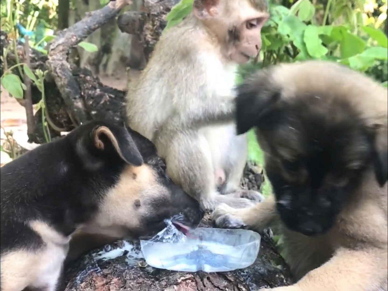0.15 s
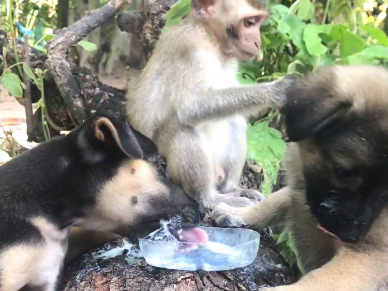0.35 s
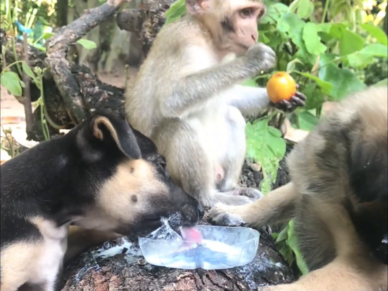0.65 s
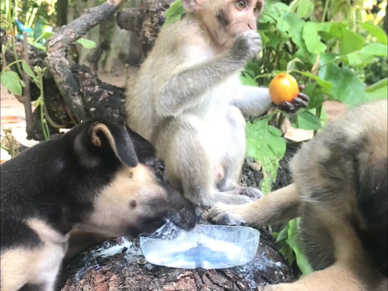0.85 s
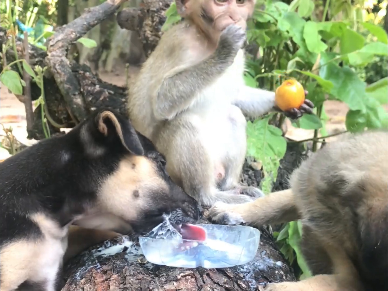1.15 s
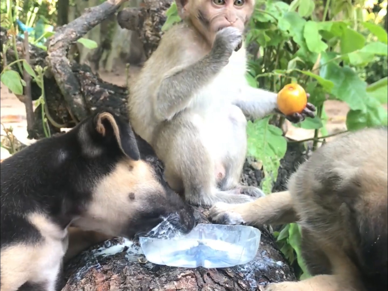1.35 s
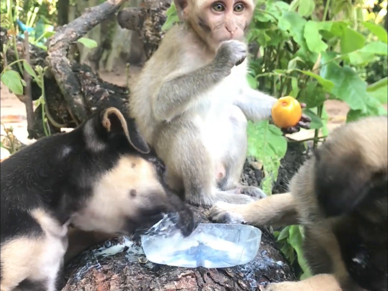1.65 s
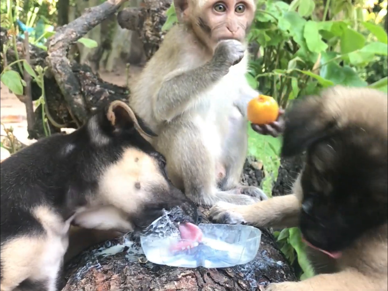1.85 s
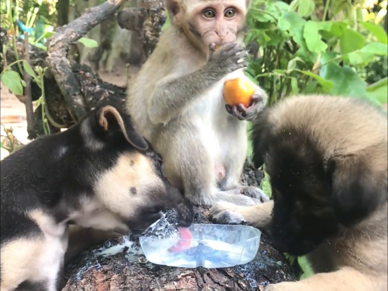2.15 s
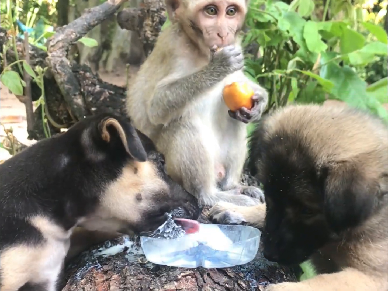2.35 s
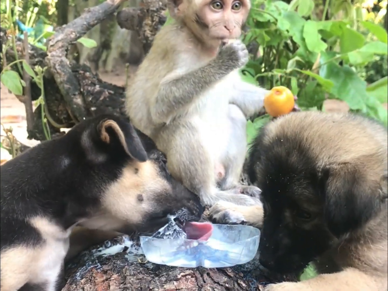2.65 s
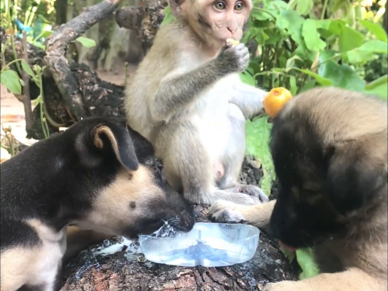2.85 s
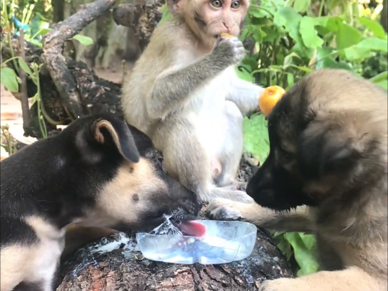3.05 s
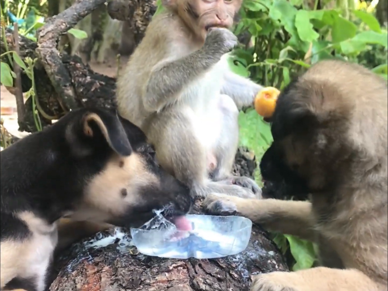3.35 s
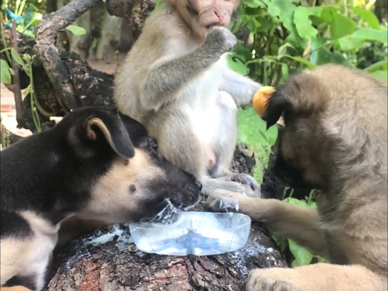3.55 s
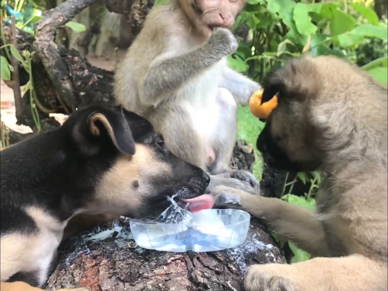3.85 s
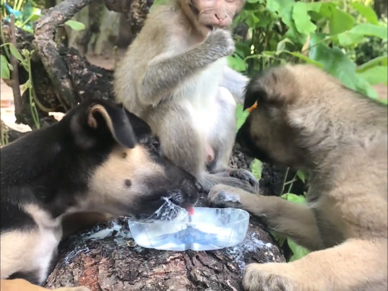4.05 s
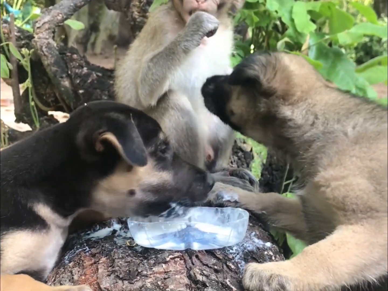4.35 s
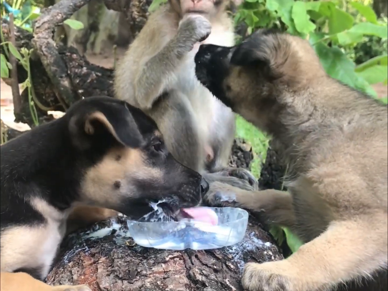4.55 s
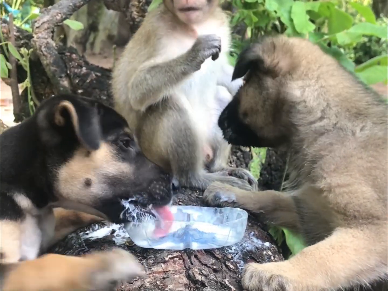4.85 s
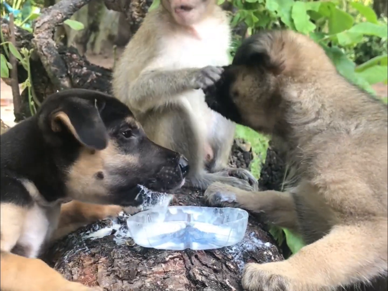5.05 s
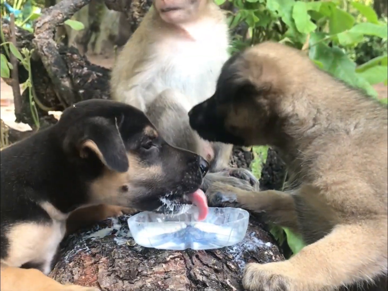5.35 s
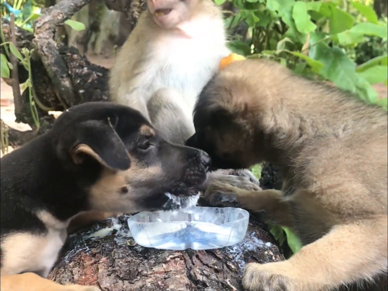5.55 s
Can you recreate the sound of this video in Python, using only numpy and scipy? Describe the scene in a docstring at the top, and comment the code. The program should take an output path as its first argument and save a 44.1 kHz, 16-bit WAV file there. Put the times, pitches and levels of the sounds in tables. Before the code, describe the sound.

Close to the microphone, a puppy laps milk from a thin plastic dish in irregular wet clicks and tiny pops. Just after one second another puppy gives a short, high, sagging whine with faint grunts. Lapping continues, with soft sniffs later and a dense, loud slurpy burst near five seconds. Small birds chirp throughout among echoing trees, over leaf hiss, a faint far cock crow at the start and a distant slow engine. Almost mono.

```python
"""Outdoors among echoing trees, a puppy laps milk from a shallow plastic dish: wet clicks of short ringing pops
and fizzes of filtered noise. Another whines once and grunts (gliding sines), and sniffs (swelling noise).
Small birds whistle in gliding sines and a far cock crows as noise through throat resonances. A slow one-cylinder
engine thumps in the distance as filtered pulses, over hissing leaves and insects; the image is almost mono."""
import sys
import numpy as np
from scipy import signal
from scipy.fft import rfft, irfft, next_fast_len
from scipy.io import wavfile
from scipy.ndimage import uniform_filter1d

SR = 44100
rng = np.random.default_rng(int(sys.argv[2]) if len(sys.argv) > 2 else 0)


def wav_out(sig):
    """Save sig, one row per channel (or a flat mono array), as 16-bit PCM at SR to the path in sys.argv[1]."""
    wavfile.write(sys.argv[1], SR, np.round(np.clip(np.atleast_2d(sig).T, -1, 1) * 32767).astype(np.int16))


N = 251370

# Wet clicks of tongue, lips and milk. Each row: start in seconds, level in dB, cavity pitch in Hz.
CLICKS = [(0.051, -22, 866), (0.578, -26, 1660), (.7637, -26, 12600), (0.86, -25, 12000), (0.88, -22, 4480),
          (0.8999, -19, 2320), (.9044, -17, 13700), (0.9073, -19.5, 2095), (0.9136, -10.5, 3570),
          (1.018, -29, 1400), (1.0463, -19.5, 14800), (1.128, -22.5, 1090), (1.133, -15.5, 4760),
          (1.2332, -20.5, 8660), (1.353, -22.5, 2740), (1.474, -21.5, 4600), (1.634, -27.5, 1020),
          (1.685, -24, 14100), (1.7183, -18, 3700), (1.7989, -23.5, 1600), (1.8076, -24.5, 11300),
          (1.9661, -18.5, 1100), (2.0145, -32, 1280), (2.0163, -21, 14000), (2.2572, -21, 614),
          (2.443, -29, 1150), (2.408, -33, 1240), (2.557, -35.5, 1400), (2.941, -33.5, 1017),
          (3.43, -33.5, 1350), (3.705, -32.5, 350), (2.555, -32, 12500), (4.771, -21, 2720),
          (2.83, -23.5, 1650), (2.84, -25, 13000), (2.846, -21.5, 3760), (3.027, -15, 4000),
          (3.026, -21, 12060), (3.0317, -21, 3200), (3.0487, -19, 13500), (3.05, -26.5, 676),
          (3.227, -24, 14000), (3.262, -5, 14200), (3.28, -27, 323), (3.362, -19, 13500),
          (3.3732, -17, 8350), (3.373, -29, 1200), (3.556, -33, 1000), (3.59, -28, 353.4),
          (3.925, -24, 13600), (4.1975, -19.5, 895), (4.196, -25, 14400), (4.473, -26.5, 2120),
          (4.6287, -12, 10500), (4.734, -25.5, 1950), (4.7788, -17, 13300), (4.7866, 0, 9950),
          (4.9021, -20, 2640), (4.9048, -12, 2550), (4.9409, -12, 3260), (4.9492, -20, 3350),
          (4.9522, -30, 3080), (4.955, -21, 2880), (4.9778, -9, 4200), (4.9817, -21, 2970),
          (4.9852, -11.5, 3860), (4.9906, -3.5, 5500), (4.999, -14, 5030), (5.0045, -18, 5200),
          (5.0042, -28, 4750), (5.0077, -17, 5140), (5.0105, -27, 5400), (5.015, -18, 5600),
          (5.052, -28, 570), (5.056, -28, 1770), (5.056, -28.5, 420), (5.062, -25, 570),
          (5.177, -26.5, 1970), (5.1775, -18.5, 8300), (5.1884, -16.5, 3920), (5.189, -21, 12800),
          (5.2661, -20, 8660), (5.336, -29, 1640), (5.407, -32.5, 546), (5.5554, -15.5, 8700)]
# How long a cavity rings. Each row: cavity pitch in Hz, decay in cycles.
RING_CYCLES = [(800, 1.5), (1100, 3), (3500, 1.8), (9000, 1.3), (13000, 4)]
# Low plops spatter longer. Each row: cavity pitch in Hz, spatter length in ms.
SPATTER_MS = [(1800, 6), (2300, 2.6)]
# Froth fizzing between tongue and dish. Each row: start in seconds, length in seconds, level in dB, centre in Hz.
FIZZES = [(1.132, 0.0064, -47, 5000), (1.706, 0.024, -32, 2770), (2.454, 0.033, -39, 1880),
          (3.48, 0.016, -39, 4070), (4.758, 0.04, -40, 12500), (4.901, 0.013, -22, 3120),
          (4.944, 0.015, -22, 3530), (4.973, 0.022, -21, 4230), (4.999, 0.021, -22, 5840)]
# The whine holds, slips a step, sags and breaks. Each row: time in seconds, pitch in Hz, fundamental rms in dB.
WHINE = [(1.155, 978, -43), (1.168, 977, -17.5), (1.205, 999, -14), (1.3, 1004, -15), (1.312, 959.6, -14.5),
         (1.4, 945, -15), (1.47, 909, -18), (1.515, 845, -26), (1.53, 730, -40), (1.54, 724, -26.5),
         (1.553, 612, -68)]
# How the nose passes the overtones of the whine. Each row: frequency in Hz, gain in dB.
NOSE = [(3000, -41), (3700, -33), (4000, -44), (5600, -56), (6800, -46), (7800, -54), (9300, -43),
        (10200, -56)]
# Low closed-mouth grunts. Each row: start in seconds, length in seconds, start pitch in Hz, end pitch in Hz,
# fundamental rms at mid-note in dB.
GRUNTS = [(1.206, 0.062, 477, 410, -44.5), (1.455, 0.13, 470, 426, -46),
          (4.121, 0.226, 300.4, 327.6, -46.5)]
# Soft puffs through a puppy's nose. Each row: start in seconds, length in seconds, level at the crest in dB.
SNIFFS = [(3.889, 0.064, -37.5), (4.097, 0.081, -36.5), (4.277, 0.05, -39), (4.465, 0.042, -34.5),
          (5.587, 0.048, -36.5)]
# Colour of the nostrils. Each row: frequency in Hz, relative density in dB per Hz.
NOSTRILS = [(900, -14), (2000, -4), (4000, -4), (8000, -17), (15700, -19), (16000, -80)]
# Fur brushing on bark, thin and high. Each row: start in seconds, length in seconds, level at the crest in dB.
RUSTLES = [(1.34, 0.25, -47.5), (2.79, 0.091, -40.5), (3.21, 0.14, -40.5), (3.94, 0.092, -44.5)]
# Colour of the fur. Each row: frequency in Hz, relative density in dB per Hz.
FUR = [(6000, 4.5), (10000, -12), (14500, 1.5), (15700, -16), (16000, -80)]
# Bird note, a chip. Each row: time from its start in seconds, pitch in Hz, level relative to the note in dB.
CHIP = [(0, 5710, 9), (.006, 5950, 12.5), (.011, 5770, 11), (.018, 5150, 18)]
# Bird note, a rising sweep. Each row: time from its start in seconds, pitch in Hz, relative level in dB.
SWEEP = [(0, 2160, -6.5), (.015, 3090, -2), (.03, 4200, 7), (.04, 4990, -3.5)]
# Bird note, an arch. Each row: time from its start in seconds, pitch in Hz, relative level in dB.
ARCH = [(0, 3000, -22), (.015, 3080, -7), (.04, 3200, -4), (.055, 2850, -3), (.07, 2580, -18)]
# Bird note, a soft lead-in. Each row: time from its start in seconds, pitch in Hz, relative level in dB.
LEAD = [(0, 2690, 1.5), (.044, 2750, -1), (.058, 3080, 4)]
# Bird note, a hook. Each row: time from its start in seconds, pitch in Hz, relative level in dB.
HOOK = [(0, 2930, 3.5), (.012, 3415, 7), (.03, 3430, 1), (.045, 3060, 2)]
# A bird that chips steadily. Each row: start in seconds, note level in dB.
CHIPS = [(0.247, -54.5), (0.696, -56.5), (1.643, -54.5), (2.081, -53), (2.527, -55.5), (2.943, -52),
         (3.379, -55), (3.815, -55), (4.24, -50.5), (4.667, -51.5), (5.072, -53.5), (5.49, -53.5)]
# A bird that sweeps up, then arches. Each row: start in seconds, sweep level in dB, time from the start of the
# sweep to the arch in seconds, arch level in dB.
SWEEPER = [(3.691, -39.5, 0.091, -34.5), (4.062, -37, 0.087, -32.5), (4.397, -35.5, 0.083, -34),
           (4.758, -37.5, 0.094, -39), (5.119, -39.5, 0.11, -37), (5.466, -37, 0.11, -36)]
# A bird whose lead-in runs into a hook. Each row: start of the hook in seconds, hook level in dB, lead-in level in dB.
HOOKER = [(0.017, -44, -41.5), (0.464, -44.5, -45.5), (.927, -46, -51.5), (1.406, -47.5, -56),
          (1.851, -45, -50), (2.29, -47, -44.5), (2.734, -45, -42.5), (3.143, -43, -43.5),
          (3.591, -42, -43.5), (4.023, -46, -53), (4.444, -42, -53.5), (4.87, -43.5, -48.5),
          (5.281, -45, -47)]
# Single notes of small birds. Each row: start in seconds, length in seconds, start pitch in Hz, end pitch in Hz,
# level at mid-note in dB.
TWEETS = [(0.673, 0.038, 7270, 7180, -52), (0.705, 0.03, 6350, 6810, -44), (2.435, 0.012, 4900, 5350, -38),
          (2.454, 0.039, 4710, 5770, -38.5), (3.338, 0.029, 5120, 5500, -45.5),
          (4.326, 0.019, 5300, 5500, -42), (4.917, 0.025, 4500, 5500, -41)]
# Throat resonances of the cock. Each row: centre in Hz, width in Hz, gain in dB.
CROW_THROAT = [(632, 59, 5), (770, 42, 8.5), (1333, 150, 10.5), (1466, 43, 8), (1578, 19, 10)]
# Colour of the engine. Each row: frequency in Hz, relative level in dB (per Hz for the rumble).
EXHAUST = [(15, -33), (25, -6), (45, 0), (64, -0.5), (113, -0.5), (241, -19.5), (420, -33.5), (550, -98)]
# Colour of leaves and distance. Each row: frequency in Hz, relative density in dB per Hz.
AIR = [(120, 4.5), (200, 2), (400, -5), (800, -8), (1800, -13), (3200, -7.5), (5500, -13), (7500, -20.5),
       (10000, -18), (14000, -17.5), (15800, -14.5), (16100, -80)]
# Thin band of insects. Each row: frequency in Hz, relative density in dB per Hz.
INSECTS = [(10500, -70), (11200, -4), (11600, -1), (12200, -8), (13000, -74)]


def lapping():
    """Clicks and fizzes over a faint scattered dribble, with a short scattered echo."""
    out = np.zeros(N)
    for start, db, hz in CLICKS:
        length_ms, cycles = along(SPATTER_MS, hz), along(RING_CYCLES, hz)
        add(out, start, pops(db, hz, length_ms, later_db=-13, cycles=cycles, spread=.25, count=5))
    for start, seconds, db, hz in FIZZES:
        add(out, start, fizz(seconds, db, hz))
    for when, size, pitch in rng.random((700, 3)):
        # low plops and high ticks stand out
        db = -45 - 4 * np.log(size + .07) + 4 * np.cos(2 * np.pi * pitch)
        drip = pops(db, 800 * 19 ** pitch, length_ms=14, later_db=-3, cycles=1.6, spread=.35, count=3)
        add(out, when * N / SR, drip)
    return out + amp(-14) * echoes(out, .055, piece_s=.1)


def pops(db, hz, length_ms, later_db, cycles, spread, count):
    """One wet contact: a first pop with a sharp crack, then weaker ringing pops scattered after it."""
    t = np.arange(round(.02 * SR)) / SR
    delay_draw, pitch_draw, level_draw = rng.standard_normal((3, count, 1))
    later = np.arange(count)[:, None] > 0  # false for the first pop only
    delay = later * np.abs(delay_draw) * length_ms / 2000
    age = np.clip(t - delay, 0, None)
    pitch = np.minimum(hz * np.exp(spread * pitch_draw * later), SR * .4)
    turns = age * pitch
    swell = (1 - np.exp(-6 * turns)) * np.exp(-turns / cycles)
    gain = amp(later * (2 * level_draw + later_db))
    sound = np.sum(gain * swell * np.sin(2 * np.pi * turns), axis=0)
    first = turns[0]
    crack = np.exp(-4 * first) * np.diff(rng.standard_normal(len(t) + 1))
    sound += .16 * crack
    if hz < 2000:  # the slap of a plop
        sound += .5 * first ** .3 * np.exp(-2.5 * first) * np.sin(5 * np.pi * first)
    return amp(db) * sound / np.abs(sound).max()


def fizz(seconds, db, hz):
    """Dense tiny bursts of uneven size through a broad mouth resonance, with a thin spray on top."""
    size = round(seconds * SR)
    unevenness = unit(uniform_filter1d(rng.standard_normal(size), 30))
    sparks = rng.standard_normal(size) * amp(5.5 * unevenness)
    low_cut = signal.butter(3, hz / 1.9, "high", fs=SR, output="sos")
    high_cut = signal.butter(3, min(hz * 1.11, SR * .45), fs=SR, output="sos")
    body = signal.sosfilt(np.vstack([low_cut, high_cut]), sparks)
    spray = np.gradient(np.gradient(sparks))
    return amp(db) * np.sqrt(np.hanning(size)) * unit(body + amp(-22) * spray)


def puppy():
    """A nasal whine, almost a pure tone, and soft grunts with one overtone."""
    out = np.zeros(N)
    phase, level = glide(WHINE)
    pitch = np.gradient(phase) * SR / (2 * np.pi)
    overtones = sum(amp(along(NOSE, k * pitch)) * np.sin(k * phase) for k in range(2, 12))
    add(out, WHINE[0][0], level * (np.sin(phase) + overtones))
    for grunt in GRUNTS:
        phase, level = glide(slur(*grunt, bend=1.37, edge_db=-6))
        add(out, grunt[0], level * (np.sin(phase) + amp(-7.0) * np.sin(2 * phase)))
    return out + amp(-33) * echoes(out, 1.0, piece_s=.1)


def sniffing():
    """A puppy's sniffs and the rustle of its coat, whose hairs catch in little jerks."""
    catches = unit(amp(5 * unit(uniform_filter1d(rng.standard_normal(N), 70))))
    sniffs = puffs(SNIFFS, NOSTRILS, patchy_db=1.5)
    return sniffs + catches * puffs(RUSTLES, FUR, patchy_db=3)


def puffs(events, spectrum, patchy_db):
    """Breathy noise under a smooth swell for each event."""
    swell = np.zeros(N)
    for start, seconds, db in events:
        add(swell, start, amp(db) * np.hanning(round(seconds * SR)))
    return swell * noise(spectrum, patchy_db)


def birds():
    """Whistled notes, each sung a little differently, ringing among the trees."""
    repeated, single = np.zeros((2, N))
    notes = [(CHIP, start, db) for start, db in CHIPS]
    for start, db, pause, arch_db in SWEEPER:
        notes += [(SWEEP, start, db), (ARCH, start + pause, arch_db)]
    for start, db, lead_db in HOOKER:
        notes += [(LEAD, start - 0.053, lead_db), (HOOK, start, db)]  # lead-in time in seconds
    for shape, start, db in notes:
        phase, level = glide(shape)
        unsteady = amp(db + 2 * flutter(len(phase)))
        detune = rng.normal(1, 0.00758)
        add(repeated, start, unsteady * level * np.sin(phase * detune))
    for tweet in TWEETS:
        phase, level = glide(slur(*tweet, bend=4.2, edge_db=2.5))
        ragged = flutter(len(phase)) * (tweet[2] / 6000) ** 3  # higher voices are rougher
        add(single, tweet[0], level * amp(2 * ragged) * np.sin(phase + ragged / 3))
    return repeated + single + amp(0.7) * echoes(repeated + amp(-3) * single, 0.54, piece_s=0.054)


def flutter(size):
    """Quick unsteadiness of a small voice, rms 1."""
    return unit(uniform_filter1d(rng.standard_normal(size), 150))


def glide(rows):
    """Phase and envelope of a voiced note from rows (seconds, Hz, rms dB), with soft ends."""
    s, hz, db = np.transpose(rows)
    t = np.arange(s[0], s[-1], 1 / SR)
    ends = np.clip(np.minimum(t - s[0], s[-1] - t) / 0.0028, 0, 1)
    phase = 2 * np.pi * np.cumsum(np.interp(t, s, hz)) / SR
    return phase, np.sqrt(2) * ends * amp(np.interp(t, s, db))


def slur(start, seconds, start_hz, end_hz, db, bend, edge_db):
    """Rows of a short note: pitch moves earlier the greater the bend, level curves by edge_db at both ends."""
    u = np.linspace(0, 1, 9)
    pitch = start_hz + (end_hz - start_hz) * (1 - (1 - u) ** bend)
    return np.transpose([start + u * seconds, pitch, db + edge_db * (2 * u - 1) ** 2])


def cock():
    """So far off that only smeared bands of its rough voice arrive; it holds, then fades."""
    level_db, hold_s, fade_db_per_s, end_s = -43, 0.91, 55, 1.2
    t = np.arange(N) / SR

    def throat(f):
        """Sum of the throat's resonant bands."""
        return sum(amp(g) * 1j * f * w / (c * c - f * f + 1j * f * w) for c, w, g in CROW_THROAT)

    voice = unit(filtered(rng.standard_normal(N), throat))
    return voice * amp(level_db - fade_db_per_s * np.clip(t - hold_s, 0, None)) * (t < end_s)


def engine():
    """One thump per firing and its echoes off the same far walls, over a rumble that never repeats."""
    firing_hz, first_s = 8.165, .013
    times = first_s + np.arange(int(N / SR * firing_hz) + 1) / firing_hz
    time_draw, level_draw = rng.standard_normal((2, len(times)))
    spots = np.round((times + .0012 * time_draw) * SR).astype(int)  # slightly uneven, in samples
    firings = np.zeros(N)
    firings[np.clip(spots, 0, N - 1)] = amp(0.27 * level_draw)
    t = np.arange(SR // 4) / SR
    walls = 0.0077 * rng.standard_normal(len(t)) * amp(-60 * t / 0.54) * (t > .015)
    walls[0] = 1  # the direct thump
    echoed = signal.fftconvolve(firings, walls)[:N]
    thumps = unit(filtered(echoed, lambda hz: amp(along(EXHAUST, hz))))
    return amp(-38.5) * thumps + amp(-34.5) * noise(EXHAUST, patchy_db=0.94)


def backdrop():
    """Leaves and distance hiss as patchy noise, with a thin band of insects on top."""
    leaves = noise(AIR, patchy_db=1.6)
    insects = noise(INSECTS, patchy_db=1.2)
    return amp(-43) * leaves + amp(-59.5) * insects


def echoes(x, t60, piece_s):
    """Scattered answer of the surroundings, decaying 60 dB in t60, with a new pattern for each piece of time."""
    out = np.zeros(N)
    t = np.arange(round(t60 * SR)) / SR
    step = round(piece_s * SR)
    for k in range(0, N, step):
        tail = rng.standard_normal(len(t)) * amp(-60 * t / t60) * t / (t + .03 * t60)
        add(out, k / SR, signal.fftconvolve(x[k:k + step], tail / np.linalg.norm(tail)))
    return out


def noise(spectrum, patchy_db):
    """Coloured noise of rms 1 with patches of random gain over time and frequency."""
    z = signal.stft(rng.standard_normal(N), nperseg=512)[2]
    field = uniform_filter1d(uniform_filter1d(rng.standard_normal(z.shape), 6, 0), 8, 1)
    patchy = signal.istft(z * amp(patchy_db * unit(field)), nperseg=512)[1][:N]
    return unit(filtered(patchy, lambda hz: amp(along(spectrum, hz))))


def filtered(x, response):
    """x times a response of frequency, padded so that the ends do not wrap."""
    m = next_fast_len(N + SR // 2)
    return irfft(rfft(x, m) * response(np.fft.rfftfreq(m, 1 / SR)), m)[..., :N]


def along(points, hz):
    """Reads (Hz, value) points on a log frequency axis."""
    f, v = np.transpose(points)
    return np.interp(np.log(hz + 1), np.log(f + 1), v)


def amp(db):
    """Decibels to gain."""
    return 10 ** (np.asarray(db) / 20)


def unit(x):
    """Scaled to rms 1."""
    return x / np.sqrt(np.mean(x ** 2) + 1e-20)


def add(track, start, sound):
    """Mixes a sound in at a time in seconds, trimming what falls outside the track."""
    k = round(start * SR)
    sound = sound[max(-k, 0):][:max(len(track) - max(k, 0), 0)]
    track[max(k, 0):][:len(sound)] += sound


def scene():
    """All sources reach both channels alike."""
    mix = lapping() + sniffing() + puppy() + birds() + cock() + engine() + backdrop()
    return np.tile(mix, (2, 1))


def record(dry):
    """Makes the channels differ slightly in the treble; cuts rumble and everything above the band limit."""
    low_cut_hz, top_hz = 38, 16600
    width = [(3500, -100), (5500, -26), (9000, -23)]  # Hz, dB
    apart = filtered(echoes(dry[0], .02, piece_s=.3), lambda hz: amp(along(width, hz)))
    stereo = dry + np.array([apart, -apart])
    return filtered(stereo, lambda hz: (hz < top_hz) / (1 + (low_cut_hz / (hz + 1)) ** 6))


dry = scene()
out = record(dry)
wav_out(out)
```